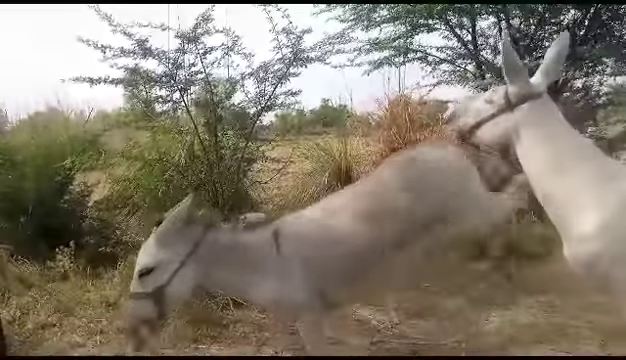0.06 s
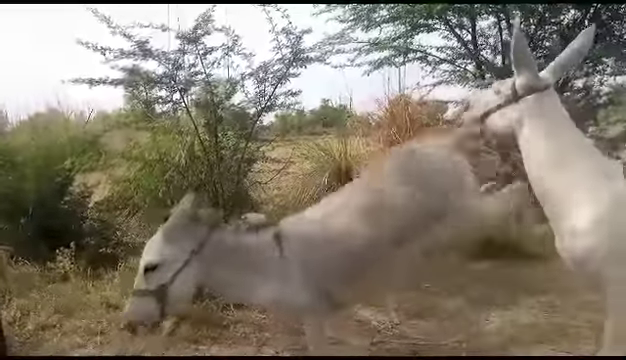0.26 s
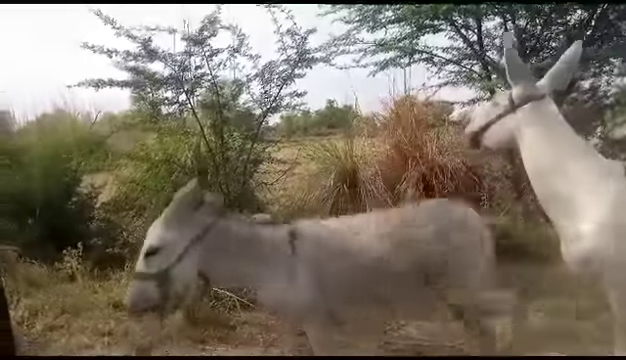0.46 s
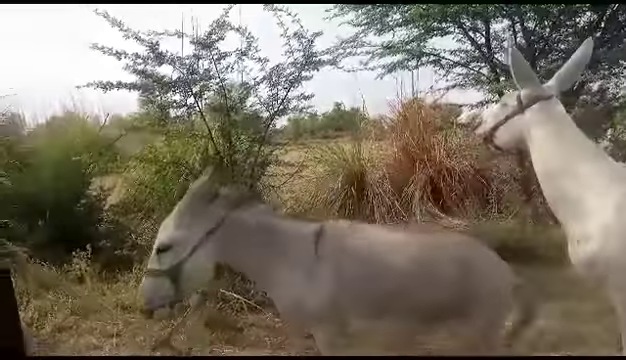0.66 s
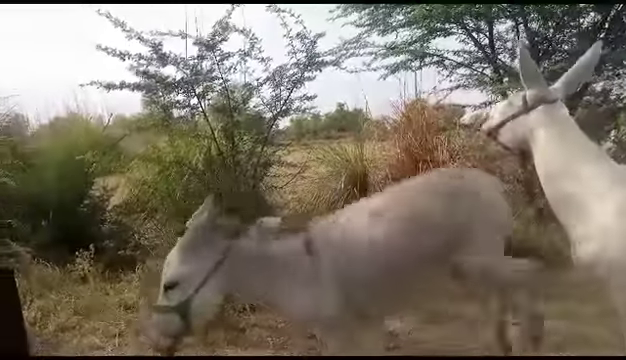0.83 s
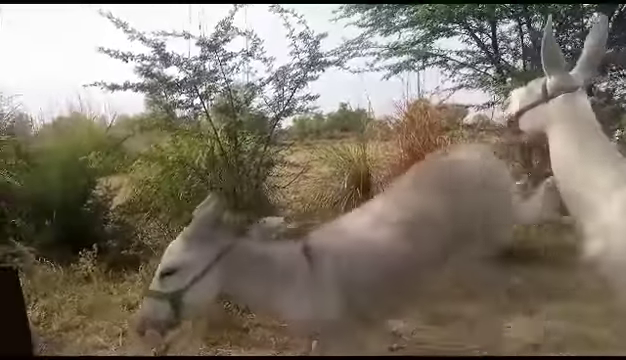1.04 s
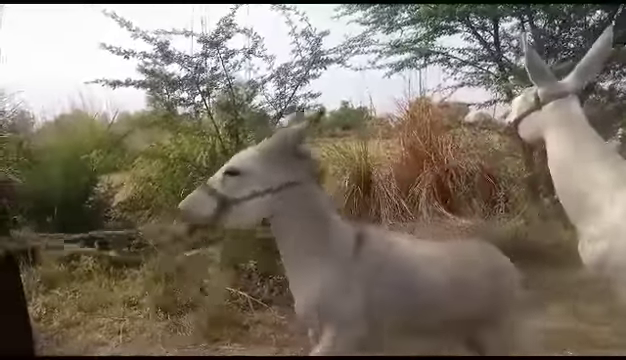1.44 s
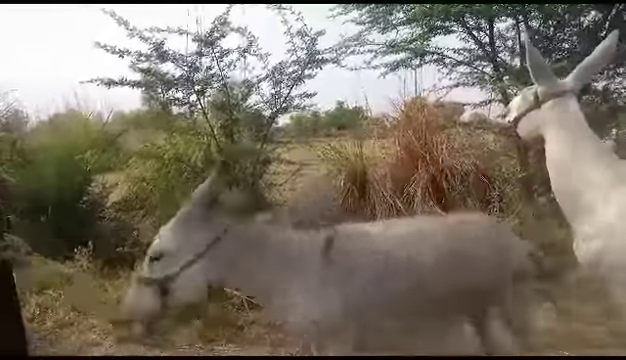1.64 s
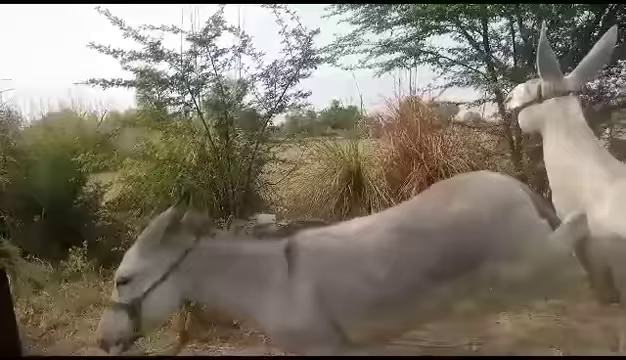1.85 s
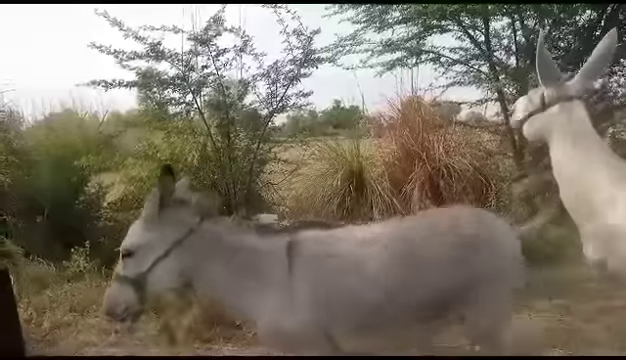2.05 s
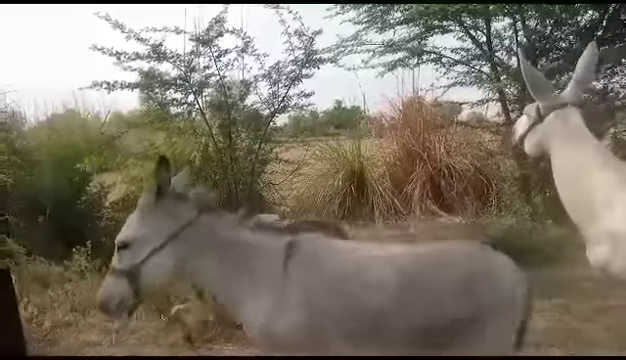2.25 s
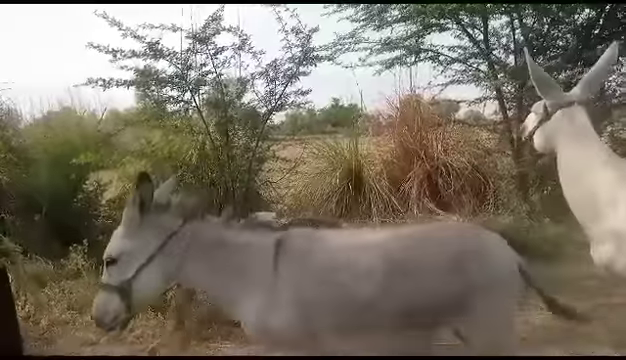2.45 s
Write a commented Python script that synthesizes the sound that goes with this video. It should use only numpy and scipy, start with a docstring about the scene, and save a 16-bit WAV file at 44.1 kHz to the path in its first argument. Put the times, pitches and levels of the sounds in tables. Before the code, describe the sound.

Hooves thud irregularly as a donkey kicks and lands in an open field, crunching soil and cracking dry straw. The thumps grow heavier, then ease off near the end, over faint air and a few tiny chirps.

```python
"""In an open field, a donkey bucks and kicks on dry ground littered with straw.
Its weight thuds into the earth, and its hooves knock, clop and scuff the soil.
Dry stalks snap, rustle and tinkle under them while the ground rumbles dully.
Behind it are a few tiny chirps and the faint air. There are no walls to echo."""
import sys
import numpy as np
from scipy import signal
from scipy.fft import rfft, irfft
from scipy.io import wavfile
from scipy.ndimage import uniform_filter1d

SR = 44100
rng = np.random.default_rng(int(sys.argv[2]) if len(sys.argv) > 2 else 0)


def to_wav(s):
    """Save 16-bit WAV."""
    ch = np.atleast_2d(s).T  # columns
    pcm = np.round(np.clip(ch, -1, 1) * 32767)  # PCM
    wavfile.write(sys.argv[1], SR, pcm.astype(np.int16))


N = 114660  # 2.6 seconds
TOP_HZ = 15850  # upper edge of the rustle and of the microphone


# The donkey's weight landing: start_s, level_db, pitch_hz
LANDINGS = [(0.199, -47, 90), (0.233, -48, 86), (0.608, -46.5, 104), (0.669, -56, 170), (0.988, -45.5, 147),
            (1.004, -40, 88), (1.044, -39, 85), (1.067, -43, 263), (1.25, -47.5, 194), (1.377, -42.5, 273),
            (1.386, -42.5, 146), (1.486, -33, 197), (1.52, -43.5, 270), (1.637, -34.5, 310),
            (1.707, -44, 88.6), (1.908, -39.5, 82), (1.978, -36.5, 107), (1.996, -29.5, 107),
            (2.029, -34, 327), (2.041, -36.5, 128), (2.193, -43, 143), (2.258, -38, 91), (2.33, -46, 70)]

def thuds():
    """The earth gives under each landing and swings for about two cycles."""
    out = np.zeros(N)
    for start_s, level_db, pitch_hz in LANDINGS:
        cycles = np.minimum(since(start_s) * pitch_hz, 20)
        progress = cycles / 0.68  # 1 at the top of the swell
        swell = (progress * np.exp(1 - progress)) ** 2.5
        out += from_db(level_db) * swell * np.sin(2 * np.pi * cycles)
    return out


# Hooves striking soil: start_s, level_db, fade_s
HOOF_STRIKES = [(0.225, -49, 0.067), (0.262, -48.5, 0.11), (0.452, -50.5, 0.031), (.649, -46.5, 0.051),
                (.674, -43.5, 0.053), (0.7658, -54, 0.053), (0.991, -49, 0.063), (1.007, -45.5, 0.079),
                (1.0247, -44.5, 0.029), (1.047, -49.5, 0.1), (1.063, -42.5, 0.072), (1.213, -51, 0.03),
                (1.376, -45.5, 0.027), (1.487, -44, 0.057), (1.6379, -42.5, 0.053), (1.9655, -38, 0.044),
                (2.0294, -39.5, 0.031), (2.081, -45.5, 0.053), (2.190, -52, 0.073), (2.229, -50, 0.073)]
# The tone of crushed soil: pitch_hz, level_db
SOIL_TONE = [(120, -2.5), (300, 7), (700, 5.5), (1100, 0.5), (1800, -1), (2600, -8.5), (6000, -10.5),
             (16000, -69)]

def knocks():
    """Each hoof crushes soil in a short, dull crunch."""
    crunch = steady(colour(rng.standard_normal(N), SOIL_TONE), samples=220)
    loudness = sum(from_db(level_db + 1) * burst(start_s, rise_s=0.00079, fade_s=fade_s)
                   for start_s, level_db, fade_s in HOOF_STRIKES)
    return crunch * loudness


# Hooves meeting hard ground: start_s, level_db, pitch_hz
HARD_STEPS = [(.6745, -64, 536), (0.7645, -44, 655), (2.0308, -41.5, 685)]
# The notes that ring together in a hoof: pitch_ratio, level_db, fade_s
HOOF_NOTES = [(.56, 1.5, 0.014), (1, 11, 0.013), (1.47, 3.5, 0.015), (2.6, -1, .014)]

def clops():
    """A hoof rings briefly on hard ground; neighbouring notes start in opposite directions."""
    out = np.zeros(N)
    for start_s, level_db, pitch_hz in HARD_STEPS:
        t = since(start_s)
        for k, (pitch_ratio, note_db, fade_s) in enumerate(HOOF_NOTES):
            note = (-1) ** k * np.sin(2 * np.pi * pitch_hz * pitch_ratio * t)
            out += from_db(level_db + note_db) * fade(t, fade_s) * note
    return out


# Dry stalks breaking: start_s, level_db, pitch_hz
STALK_BREAKS = [(.077, -48, 2800), (0.133, -47.5, 6500), (0.227, -38.5, 4100), (0.2705, -27.5, 5450),
                (0.397, -35, 4900), (0.601, -36, 5600), (.650, -41, 6900), (0.667, -34, 4440),
                (0.680, -31, 3340), (0.711, -38, 5550), (0.7641, -39, 4350), (0.918, -40, 4070),
                (.982, -44, 5500), (1.0193, -25.5, 5400), (1.0259, -30, 4900), (1.0644, -42, 3300),
                (1.182, -41, 5300), (1.2143, -30.5, 2880), (1.2862, -25.5, 3940), (1.373, -33.5, 5300),
                (1.3764, -25, 5860), (1.491, -45, 5700), (1.647, -34, 5400), (1.670, -40, 5100),
                (1.856, -33.5, 3720), (1.9658, -28, 3240), (2.034, -40, 5300), (2.07, -35, 5130),
                (2.145, -44, 5360), (2.289, -44, 5730)]

def snaps():
    """Each stalk cracks in a burst of splinters around its own rough pitch."""
    out, noise = np.zeros(N), rng.standard_normal(N)
    usual_db = np.mean([level_db for _, level_db, _ in STALK_BREAKS])
    spread = 2 ** 0.43  # 0.43 octaves to each side
    for start_s, level_db, pitch_hz in STALK_BREAKS:
        harder_db = level_db - usual_db
        body = unit_level(keep_between(noise, pitch_hz / spread, pitch_hz * spread))
        splinters = from_db(-12 + 0.22 * harder_db) * noise[::-1]  # harder snaps are brighter
        fade_s = 0.022 * 2 ** (-harder_db / 25)  # and die away sooner
        crack = steady(patchy(body + splinters), samples=64)  # each stalk favours its own pitches
        out += from_db(level_db - 9) * burst(start_s, rise_s=0.00025, fade_s=fade_s) * crack
    return out


# The tone of dry straw: pitch_hz, level_db
STRAW_TONE = [(800, -16), (1600, -3), (2800, -2.5), (4000, 4), (6000, 3), (7200, -2.5), (8500, -7),
              (13000, -8), (16000, 1.5)]

def rustle(straw_gain):
    """Straw crackles in clumps of tiny clicks; blades of each size also come and go on their own."""
    crackle = np.zeros(N)
    edges_hz = np.geomspace(1000, TOP_HZ, num=22)
    clumps_db = 2.82 * drift(per_s=90)
    for low_hz, high_hz in zip(edges_hz, edges_hz[1:]):
        clicks = grains(per_s=4000, spread_db=3.2)
        flutter_db = 4 * drift(per_s=90)
        crackle += keep_between(clicks * from_db(clumps_db + flutter_db), low_hz, high_hz)
    return from_db(-3) * straw_gain * steady(colour(crackle, STRAW_TONE), samples=1800)


def pings(straw_gain):
    """Brief high tones tinkle in the straw, as strong as the stirring that sets them off."""
    per_s, low_hz, high_hz = 150, 3550, 15800
    out, t = np.zeros(N + SR), np.arange(SR // 5) / SR
    for when, height, size in rng.random((int(per_s * N / SR), 3)):
        start = int(when * N)
        pitch_hz = low_hz * (high_hz / low_hz) ** height
        tone_db = np.interp(pitch_hz, *np.transpose(STRAW_TONE))
        gain = straw_gain[start] * size ** 2 * from_db(tone_db)
        out[start:start + len(t)] += gain * fade(t, fade_s=0.097) * np.sin(2 * np.pi * pitch_hz * t)
    return from_db(-11.5) * straw_gain.std() * unit_level(out[:N])


def scuff(soil_gain):
    """Crumbs of soil grind under the hooves."""
    clicks = grains(per_s=1800, spread_db=3.5)
    flutter = from_db(2.5 * drift(per_s=70))
    return from_db(-1.5) * soil_gain * steady(colour(clicks * flutter, SOIL_TONE), samples=1300)


# The tone of shaking ground: pitch_hz, level_db
EARTH_TONE = [(25, -18), (45, 0), (80, 11.5), (130, 3.5), (200, -2), (320, -25), (700, -34)]

def rumble(soil_gain):
    """The ground shakes under dragging feet and after landings, most and longest after deep ones."""
    usual_hz = np.median([pitch_hz for _, _, pitch_hz in LANDINGS])
    power = (from_db(-2.5) * soil_gain) ** 2
    for start_s, level_db, pitch_hz in LANDINGS:
        depth = usual_hz / pitch_hz
        shake = min(depth, 1) * burst(start_s, rise_s=0.014, fade_s=0.2 * depth)
        power += (from_db(level_db - 18) * shake) ** 2
    return np.sqrt(power) * steady(colour(rng.standard_normal(N), EARTH_TONE), samples=1800)


# Feet dragging through straw and soil: time_s, straw_db, soil_db
FOOT_DRAG = [(0, -66.5, -75), (.13, -65, -79.5), (.21, -61.5, -58), (.29, -52, -61.5), (.36, -54, -72),
             (.40, -47.5, -65), (.44, -58.5, -71.5), (.545, -55.5, -68), (.61, -54.5, -52.5),
             (.69, -57, -78), (.84, -72, -82.5), (.90, -64, -63.5), (.96, -63.5, -85), (1.03, -56, -57.5),
             (1.12, -64.5, -65), (1.20, -47.5, -63), (1.30, -50.5, -58.5), (1.345, -65.5, -85),
             (1.47, -57.5, -62), (1.52, -60, -61.5), (1.555, -65.5, -80), (1.625, -68.5, -77.5),
             (1.66, -53, -56.5), (1.727, -57.5, -66.5), (1.755, -66.5, -79), (1.82, -60.5, -81.5),
             (1.99, -61.5, -59.5), (2.05, -51.5, -57.5), (2.21, -52, -65.5), (2.275, -59, -63.5),
             (2.41, -62, -87), (2.6, -71.5, -85.5)]

def stirred_ground():
    """Dragging feet set how loudly the straw rustles and tinkles and the soil grinds and shakes."""
    time_s, straw_db, soil_db = np.transpose(FOOT_DRAG)
    straw_gain = from_db(np.interp(since(0), time_s, straw_db))
    soil_gain = from_db(np.interp(since(0), time_s, soil_db))
    return rustle(straw_gain) + pings(straw_gain) + scuff(soil_gain) + rumble(soil_gain)


# Tiny whistles: middle_s, level_db, pitch_hz, glide_octaves_per_s
WHISTLES = [(0.897, -59.5, 2295, -2.5), (1.28, -54, 5850, -3), (1.715, -57.5, 6400, 1),
            (1.775, -58, 4350, 2)]

def chirps():
    """Short, slightly wavering whistles glide as they swell and fade."""
    out, waver_hz = np.zeros(N), 68 * drift(per_s=300)
    for middle_s, level_db, pitch_hz, glide in WHISTLES:
        t = since(0) - middle_s
        sliding_hz = pitch_hz * 2 ** np.clip(glide * t, -1, 1) + waver_hz
        swell = np.exp(-(t / 0.013) ** 2)
        out += from_db(level_db) * swell * np.sin(2 * np.pi * np.cumsum(sliding_hz) / SR)
    return out


# The tone of the open air: pitch_hz, level_db
AIR_TONE = [(70, 20), (170, -9), (1200, -11.5), (6000, -36), (16000, -14)]

def air():
    """The air of the field is a faint, even hush."""
    return from_db(-76.5) * colour(rng.standard_normal(N), AIR_TONE)


def from_db(db):
    """Turn decibels into a number to multiply by."""
    return 10 ** (np.asarray(db) / 20)


def unit_level(sound):
    """Scale a sound so its average level (rms) is 1."""
    return sound / np.sqrt(np.mean(sound ** 2) + 1e-20)


def steady(noise, samples):
    """Hold the level of a noise at 1 over each short run of samples."""
    return noise / np.sqrt(uniform_filter1d(noise ** 2, samples) + 1e-9)


def since(start_s):
    """Seconds since a moment, zero before it."""
    return np.maximum(np.arange(N) / SR - start_s, 0)


def fade(t, fade_s):
    """Die away from 1, losing 60 dB every fade_s seconds until far too quiet to hear."""
    return np.exp(-np.minimum(np.log(1000) * t / fade_s, 10 * np.pi))


def burst(start_s, rise_s, fade_s):
    """Rise quickly to 1, then die away."""
    t = since(start_s)
    shape = (1 - np.exp(-t / rise_s)) * fade(t, fade_s)
    return shape / (shape.max() + 1e-12)


def drift(per_s):
    """Wander around zero by about 1, turning per_s times a second."""
    turns = rng.standard_normal(2000)
    return unit_level(np.interp(since(0) * per_s, np.arange(len(turns)), turns))


def grains(per_s, spread_db):
    """Random clicks of uneven size."""
    sizes = from_db(spread_db * np.minimum(rng.exponential(1, N), 5))
    signs = rng.choice([-1, 1], N)
    return sizes * signs * (rng.random(N) < per_s / SR)


def all_hz():
    """The pitches that rfft splits a sound into."""
    return np.maximum(np.arange(N // 2 + 1) * SR / N, 1)


def colour(sound, tone):
    """Shape a sound's lows and highs with a tone table; the result has level 1."""
    pitch_hz, level_db = np.transpose(tone)
    gain_db = np.interp(np.log(all_hz()), np.log(pitch_hz), level_db)
    return unit_level(irfft(rfft(sound) * from_db(gain_db), N))


def patchy(noise, patches=60, spread_db=5):
    """Make random patches of pitch louder or softer."""
    patch_db = spread_db * rng.standard_normal(patches)
    gain_db = np.interp(all_hz(), np.linspace(0, SR / 2, patches), patch_db)
    return irfft(rfft(noise) * from_db(gain_db), N)


def keep_between(sound, low_hz, high_hz):
    """Let through mainly the pitches between two limits."""
    return signal.sosfilt(signal.butter(2, [low_hz, high_hz], "band", fs=SR, output="sos"), sound)


def scene():
    """Hooves, soil and straw over the faint air of the field, in one channel."""
    return (thuds() + knocks() + clops() + snaps() + stirred_ground() + chirps() + air())[None]


# The microphone's peaks and dips: pitch_hz, width_octaves, level_db
MIC_BUMPS = [(482, 0.18, -8.5), (3010, 0.1, -1.5), (6530, 0.096, 6.5), (15100, 0.028, 11)]

def record(dry):
    """A small microphone adds a few peaks and dips, thins the bass and cuts the very top."""
    gain_db = sum(level_db * np.exp(-0.5 * (np.log2(all_hz() / pitch_hz) / width_octaves) ** 2)
                  for pitch_hz, width_octaves, level_db in MIC_BUMPS)
    coloured = irfft(rfft(dry) * from_db(gain_db), N)
    thinned = signal.sosfilt(signal.butter(2, 59.5, "high", fs=SR, output="sos"), coloured)
    return signal.sosfilt(signal.ellip(12, 0.2, 70, TOP_HZ, fs=SR, output="sos"), thinned)


dry = scene()
out = record(dry)
to_wav(out)
```